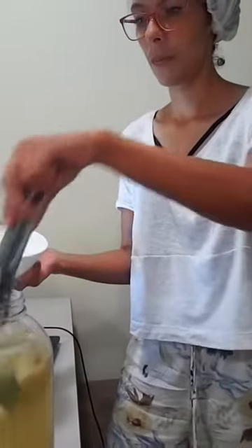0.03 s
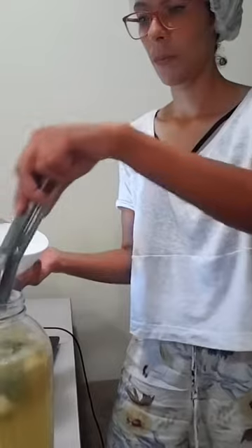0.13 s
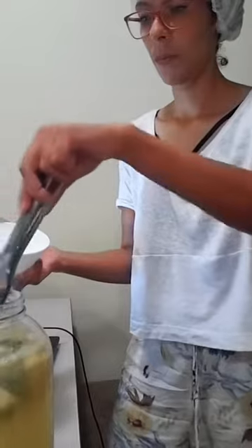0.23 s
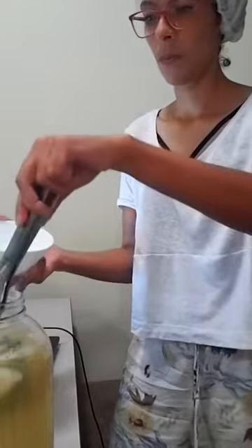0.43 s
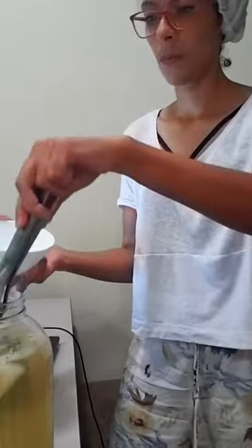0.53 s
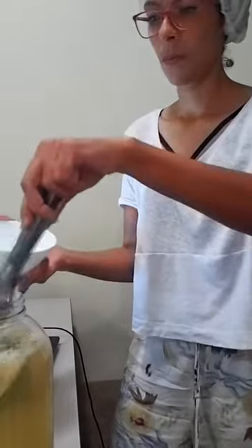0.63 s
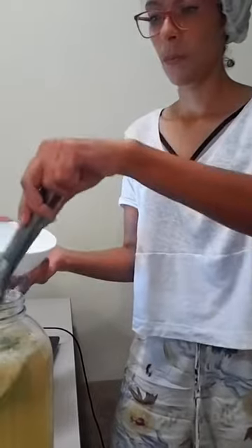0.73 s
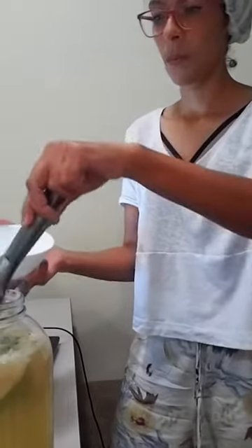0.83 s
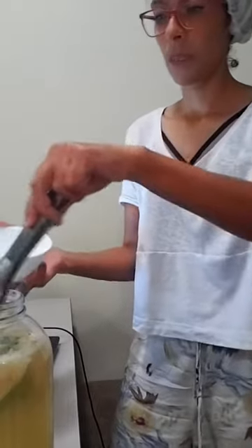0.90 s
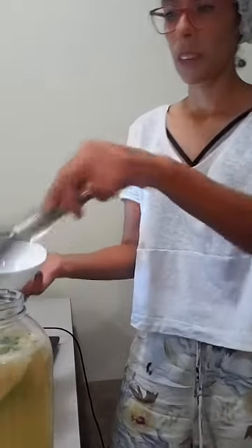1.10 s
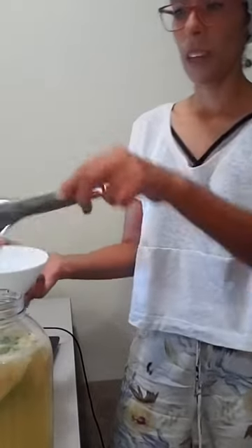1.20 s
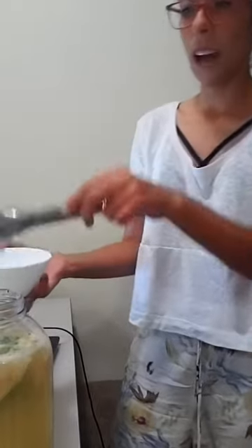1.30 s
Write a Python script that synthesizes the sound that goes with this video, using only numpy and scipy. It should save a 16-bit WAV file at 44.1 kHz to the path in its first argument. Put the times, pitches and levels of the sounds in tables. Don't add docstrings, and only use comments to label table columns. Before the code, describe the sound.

Metal kitchen tongs click brightly in four quick clusters, tapping a ceramic bowl over faint hum

```python
import sys
import numpy as np
from scipy import signal
from scipy.fft import rfft, irfft
from scipy.io import wavfile
from scipy.ndimage import uniform_filter1d, map_coordinates

SR = 44100
rng = np.random.default_rng(int(sys.argv[2]) if len(sys.argv) > 2 else 0)


def inscribe(sig):
    pcm = np.round(np.clip(np.atleast_2d(sig).T, -1, 1) * 32767)
    wavfile.write(sys.argv[1], SR, pcm.astype(np.int16))


def nominal_scale(level):
    x = np.asarray(level, float) / 20
    return 10 ** x


N = 59535


def unit(x):
    return x / np.sqrt(np.mean(x ** 2) + 1e-20)


def along(points, hz):
    f, v = np.transpose(points)
    return np.interp(np.log(hz + 1), np.log(f + 1), v)


def wobble(rate):
    knots = rng.standard_normal(int(N * rate / SR) + 4)
    return map_coordinates(knots, [np.arange(N) * rate / SR])


def noise(n, spectrum):
    gain = nominal_scale(along(spectrum, np.fft.rfftfreq(n, 1 / SR)))
    return unit(irfft(rfft(rng.standard_normal(n)) * gain, n))


def onset(t, rise_s):
    return 1 - np.exp(-t / rise_s)


def fridge():
    # time in seconds, hum frequency in Hz, level in dB.
    motor = [(0.0, 61.3, -71.5), (0.074, 60.6, -70), (0.232, 59.5, -56), (0.386, 60.3, -70),
             (0.412, 59, -78.5), (0.506, 60.34, -65), (0.548, 62.14, -80), (0.59, 60.1, -63.5),
             (0.724, 60.6, -61.5), (0.754, 57.6, -63.5), (0.834, 59.7, -66), (0.916, 59.1, -69.5),
             (1.064, 58.7, -57), (1.286, 58.8, -74.5), (1.334, 57.5, -75), (1.35, 56.3, -68)]
    # frequency in Hz, rumble density in dB per Hz.
    rumble_spectrum = [(15, -49), (25, -40.5), (36, -12), (59, 0), (74, 1.5), (86, -15), (119, -18.5),
                       (300, -32), (390, -74), (660, -120)]
    overtone_db, rumble_db, lump_db = -17.5, -71, 2
    follows = 0.29
    s, hz, db = np.transpose(motor)
    t = np.arange(N) / SR
    hz = np.interp(t, s, hz)
    db = np.interp(t, s, db)
    phase = 2 * np.pi * np.cumsum(hz) / SR
    hum = np.sqrt(2) * nominal_scale(db) * (np.sin(phase) + nominal_scale(overtone_db) * np.sin(2 * phase))
    rest = np.array(rumble_spectrum) - [[0, 12 * (45 < f < 75)] for f, _ in rumble_spectrum]
    level_db = rumble_db + follows * (db - db.mean()) + lump_db * wobble(7.3)
    return hum + nominal_scale(level_db) * noise(N, rest)


def hiss():
    # frequency in Hz, density in dB per Hz.
    hiss_spectrum = [(150, -34), (260, -6), (600, -13.5), (1700, -15.5), (4600, -23), (8000, -29.5),
                     (10300, -31.5), (11200, -21.5), (16000, -18.5)]
    level_db, patch_db = -75.5, 2.5
    z = signal.stft(noise(N + 512, hiss_spectrum), nperseg=512)[2]
    field = uniform_filter1d(rng.standard_normal(z.shape), 8, 0)
    field = uniform_filter1d(field, 12, 1)
    patchy = signal.istft(z * nominal_scale(patch_db * unit(field)), nperseg=512)[1][:N]
    return nominal_scale(level_db) * unit(patchy)


def strike(modes, ring_db, colour, burst_t60, longest=1):
    scatter_db, detune, rise_s = 2, 0.006, 0.0005
    to_room_db = -10
    t = np.arange(SR // 4) / SR
    ring = np.zeros(len(t))
    for hz, db, t60 in modes:
        decay = nominal_scale(db + scatter_db * rng.standard_normal() - 60 * t / min(t60, longest))
        mode_hz = hz * (1 + detune * rng.standard_normal())
        ring += decay * np.sin(2 * np.pi * (mode_hz * t + rng.random()))
    burst = noise(len(t), colour) * nominal_scale(-60 * t / burst_t60)
    ring_gain = nominal_scale(ring_db - 10.5 + np.array([[0], [to_room_db]]))
    return (ring_gain * ring + burst / 2) * onset(t, rise_s)


def kitchen(x):
    # frequency in Hz, decay time t60 in seconds.
    room_t60 = [(300, 0.58), (1000, 0.56), (2500, 0.44), (5000, 0.43), (8500, 0.39), (12000, 0.35),
                (16000, 0.25)]
    # frequency in Hz, room over direct sound in dB.
    room_db = [(300, 5), (1000, 5), (3000, 4), (5200, 0.5), (8000, 0), (10300, -13), (11000, -1.5),
               (16000, -9.5)]
    gap_s = 0.006
    hz, t, z = signal.stft(rng.standard_normal(SR // 2 + SR // 4), SR, nperseg=256)
    t60 = along(room_t60, hz)[:, None]
    decay = nominal_scale(along(room_db, hz)[:, None] - 60 * t / t60)
    energy = t60 * SR / np.log(1e6)
    tail = signal.istft(z * decay / np.sqrt(energy), SR, nperseg=256)[1]
    return signal.fftconvolve(np.pad(x, (round(gap_s * SR), 0)), tail)


def add(out, s, blow):
    for part in (blow[0], kitchen(blow[1])):
        piece = out[round(s * SR):][:len(part)]
        piece += part[:len(piece)]


def tongs():
    # contact time in seconds, peak level in dB, ring over crack in dB.
    clicks = [(0.2335, -39, -10), (0.2364, -23, -0.5), (0.2385, -31.5, 1), (0.2418, -29, -6),
              (0.2452, -20, -4.5), (0.2473, -23.5, -7), (0.2502, -31.5, -13), (0.2523, -42, -12),
              (0.3989, -52, 6), (0.4024, -33, 5), (0.4045, -26, -3.5), (0.4095, -37, -28),
              (0.4157, -36.5, -27), (0.5472, -36, -13), (0.556, -42, -27), (0.5918, -33.5, 1),
              (0.595, -19, -7.5), (0.6014, -20.5, -3.5), (0.6048, -23, -10), (0.6059, -29, -25),
              (0.7345, -36, -21), (0.7371, -18.5, -1.5), (0.7394, -22.5, -5.5), (0.742, -25, -11),
              (0.7453, -23, -0.5), (0.7486, -26.5, -19), (0.753, -34, -12)]
    # mode frequency in Hz, level in dB, decay time t60 in seconds.
    steel = [(3603, -21, 0.019), (3980, -14, 0.016), (4130, -20, .01), (5172, -2.5, .034), (5900, -42, .01),
             (9590, -9.5, 0.023), (10070, -8.5, 0.034), (11800, -13, 0.02), (12660, -15, 0.0061),
             (13100, -8, 0.022), (15100, -36, 0.0075)]
    # frequency in Hz, crack level in dB.
    crack = [(1750, -85), (2100, -20), (3250, -31.5), (3550, -22), (5300, -10), (7800, -21), (11000, -4.5),
             (15500, 0)]
    crack_t60, longest_s = 0.029, 0.035
    out = np.zeros(N)
    for s, db, ring_db in clicks:
        add(out, s, nominal_scale(db) * strike(steel, ring_db, crack, crack_t60, longest_s))
    snap_s, snap_db, snap_t60 = 0.5954, -10, 0.0037
    add(out, snap_s, nominal_scale(snap_db) * strike(steel, -30, crack, snap_t60, longest_s))
    return out


def bowl():
    # tap time in seconds, peak level in dB, ring over knock in dB.
    taps = [
        (0.2382, -45.5, -16.5),
        (0.2447, -51.5, -5.5),
        (0.5471, -35, -9.5),
        (0.5919, -32, -2),
        (0.595, -28, -9),
        (0.602, -31, -8),
        (0.605, -34.5, -5),
        (0.739, -53.5, 3.5),
    ]
    # mode frequency in Hz, level in dB, decay time t60 in seconds.
    ceramic = [(412, -12.5, 0.085), (768, -9, 0.042), (835, -6.5, 0.1), (944, -8, .1), (1067.5, -4, 0.041),
               (1410, -3.5, 0.025), (2150, -8, .03), (2527, -0.5, 0.039), (2824, 0.5, 0.075),
               (3911, -6, .09), (5400, -5, .025), (5860, -2, .035), (6390, -10, 0.06), (6710, -7, .03)]
    # frequency in Hz, knock level in dB.
    knock = [(120, -22), (400, -12.5), (1150, 0.5), (1800, -15), (2100, -2), (4750, -8.5), (5600, 5.5),
             (9500, -9)]
    out = np.zeros(N)
    for s, db, ring_db in taps:
        add(out, s, nominal_scale(db) * strike(ceramic, ring_db, knock, 0.019))
    return out


def counter():
    start_s, level_db, hz, t60, rise_s = 0.61, -59, 99.4, 0.9, 0.0316
    t = np.maximum(np.arange(N) / SR - start_s, 0)
    return nominal_scale(level_db - 60 * t / t60) * onset(t, rise_s) * np.sin(2 * np.pi * hz * t)


def sprig():
    # frequency in Hz, level in dB.
    brush = [(2000, -40), (5500, -15), (7500, -21.5), (10300, -15.5), (11500, -4.5), (13000, -9.5),
             (16000, -19)]
    start_s, level_db, rise_s, t60 = 1.103, -61.5, 0.0013, 0.3
    grain_db = 2.1 * wobble(170)
    t = np.maximum(np.arange(N) / SR - start_s, 0)
    return nominal_scale(level_db + grain_db - 60 * t / t60) * onset(t, rise_s) * noise(N, brush)


def scene():
    return (fridge() + hiss() + tongs() + bowl() + counter() + sprig())[None]


def band_limit(x):
    return signal.sosfilt(signal.butter(12, 16990, fs=SR, output="sos"), x)


def record(dry):
    edge = nominal_scale(np.interp(np.fft.rfftfreq(N, 1 / SR), (15550, 15950), [0, -27]))
    mix = irfft(rfft(dry) * edge, N)
    return band_limit(mix)


dry = scene()
out = record(dry)
inscribe(out)
```